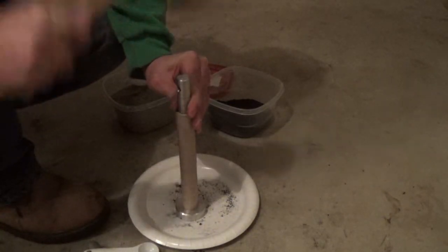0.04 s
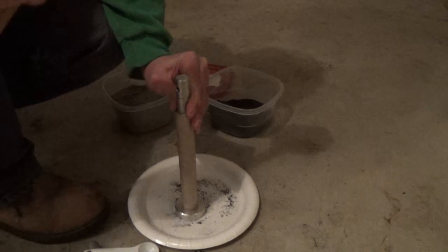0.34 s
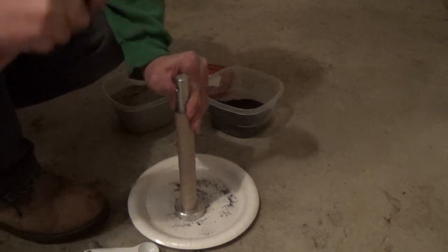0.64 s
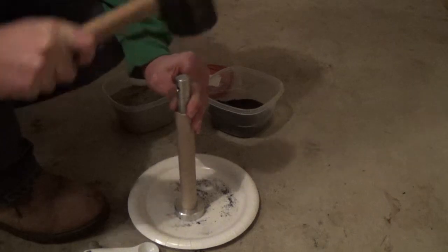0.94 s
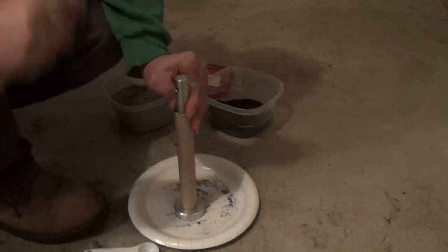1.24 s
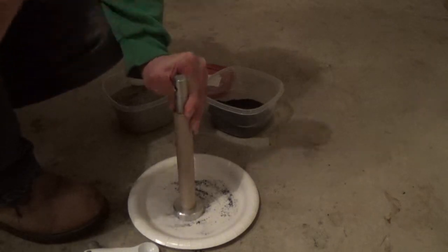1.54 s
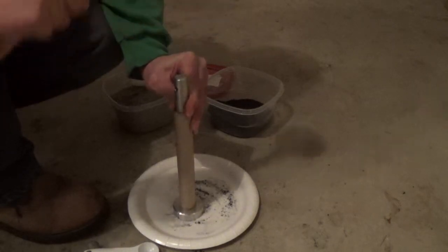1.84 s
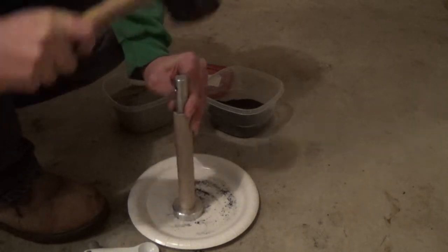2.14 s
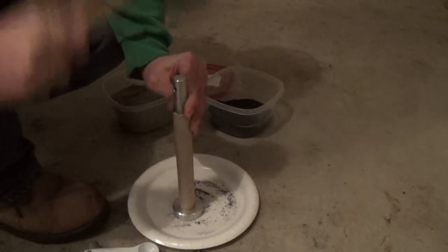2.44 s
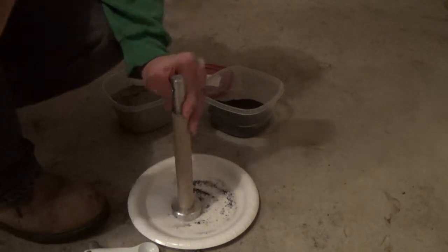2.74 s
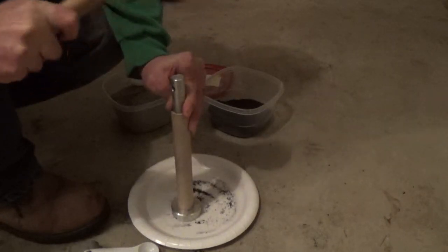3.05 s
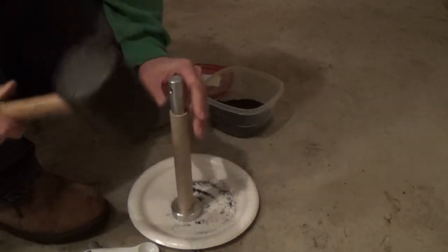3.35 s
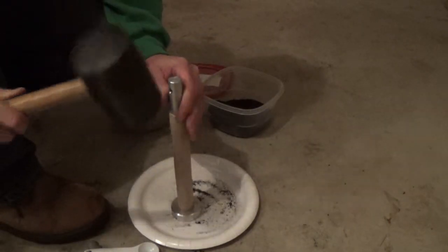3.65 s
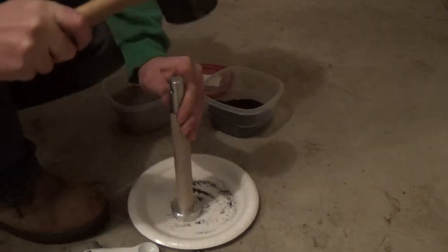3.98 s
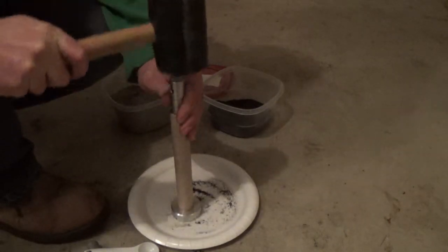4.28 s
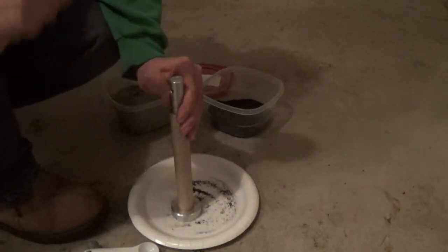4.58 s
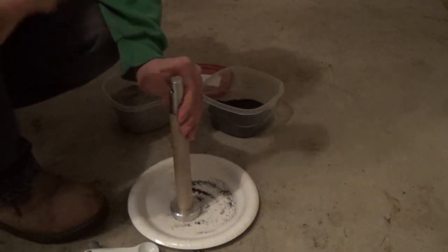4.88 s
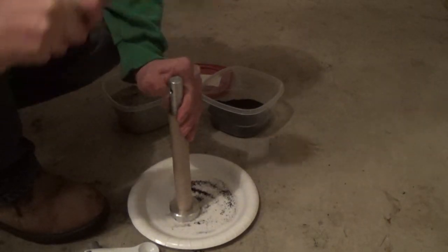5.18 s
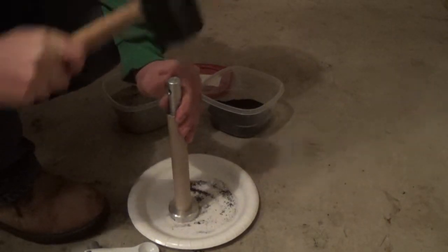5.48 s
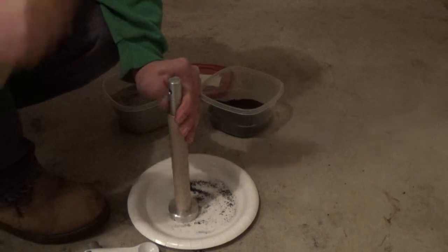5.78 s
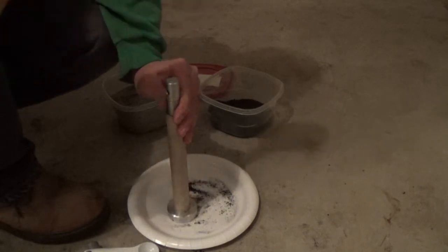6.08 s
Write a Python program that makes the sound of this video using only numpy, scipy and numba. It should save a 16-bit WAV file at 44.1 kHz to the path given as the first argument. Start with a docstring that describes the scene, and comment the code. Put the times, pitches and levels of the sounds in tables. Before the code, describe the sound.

Sharp, evenly paced mallet blows on a metal rammer ring briefly around a bare room, followed by a light tap and four deeper thuds.

```python
"""A bare room with a concrete floor, heard on a camera's stereo microphone. A heavy mallet drives a steel
rammer into a packed cardboard tube: the tail of one blow, then eight in a steady run. After a pause come
one light tap, the rustle of a sleeve and four deeper, duller blows. The hand damps the steel at once, so
the ring is the room's own. Throughout, the camera's gain control flattens the start of each loud blow,
and quiet room tone with a faint mains hum lies underneath."""
import sys
import numpy as np
from scipy import signal
from scipy.fft import rfft, irfft, next_fast_len
from scipy.io import wavfile
from scipy.ndimage import uniform_filter1d, minimum_filter1d
from numba import njit

SR = 44100
rng = np.random.default_rng(int(sys.argv[2]) if len(sys.argv) > 2 else 0)


def dump_mix(stems):
    """Bounce the given channels to the path in sys.argv[1] as a 16-bit WAV at rate SR."""
    frames = np.atleast_2d(stems).T  # one column per channel
    limited = np.clip(frames, -1, 1)  # hard clip at full scale
    pcm = np.round(limited * 32767).astype(np.int16)
    wavfile.write(sys.argv[1], SR, pcm)


N = 269892
RING, LEAD = 32768, SR // 2  # samples that one blow rings for, samples of lead-in
AGE = np.arange(RING) / SR
FREQS = np.fft.rfftfreq(RING, 1 / SR) + 1
# side against mid at the microphone: frequency_hz, side_db
WIDTH = [(60, -55), (200, -32), (600, -10.5), (1300, -8.5), (4400, -8), (7000, -8), (9500, -25),
         (15000, -68)]


def ramming():
    """Each blow cracks, thuds through the tube into the floor and wakes the room from the same spot."""
    # mallet blows: start_s, force_db, softness (of the contact, 0-1), give (of the filling, 0-1)
    blows = [(-.305, -2.5, 0.4, .2), (.1005, 0, 0, 0.27), (0.4991, -1, 0.22, 0), (.9105, -.5, 0.12, 0.1),
             (1.3132, -.5, 0.18, 0), (1.7089, 0, 0, 0), (2.1019, -1, 0.19, 0.14), (2.496, -0.5, 0.06, .1),
             (2.897, -.5, 0.1, 0.04), (4.2082, -18, .9, 0.45), (4.6776, -2.5, 0.82, 1),
             (5.088, -1.5, 0.73, .25), (5.471, -1, 0.83, 0.4), (5.8543, 0, 0.4, 0.23)]
    walls = rfft(stereo_noise(RING))
    standing = standing_waves(db=-16.0, build_s=0.0041, spread=0.28)
    fade = np.minimum(1, 10 * (1 - AGE / AGE[-1]))
    out = np.zeros((2, next_fast_len(LEAD + N + RING)))
    for start_s, force_db, softness, give in blows:
        # the ping grows faster than the force, and is weaker on a filling that yields
        ping_db = 14.5 + 1.2 * force_db - 17 * give
        contact = crack(db=20.5) + ping(ping_db, lag_s=0.000795)
        # a long, soft contact pushes more of the blow down into the floor
        tube_thud = undb(-2.5 + 6 * softness) * knock(hz=193, decay_s=0.0028)
        floor_thump = undb(-41 + 23 * give) * knock(hz=50, decay_s=0.0062)
        echo = standing + reverberation(walls, db=0.5, build_s=0.00039)
        blow = colour(contact + tube_thud + floor_thump + echo, blow_colour(softness, give))
        start = max(LEAD + int(start_s * SR), 0)
        out[:, start:start + RING] += undb(force_db) * fade * blow
    return microphone_ports(out)[:, LEAD:LEAD + N]


def crack(db, decay_s=0.0009):
    """The mallet meets the steel in a short crunch of noise, new at every blow."""
    # spectrum of the contact: frequency_hz, level_db
    spectrum = [(60, 6.5), (300, -25), (1000, 12.5), (2500, 10), (4200, 10.5), (6000, 12.5), (10000, 3),
                (12500, 0), (15000, -14)]
    burst = rng.standard_normal((1, RING)) * (AGE / decay_s) * np.exp(-AGE / decay_s)
    return undb(db) * colour(burst / np.linalg.norm(burst), along(spectrum, FREQS))


def ping(db, lag_s):
    """The steel rings for an instant as the rammer bottoms out."""
    # high modes of the steel under the mallet: pitch_hz, level_db, decay_s
    modes = [(5810, -14, 0.0006), (5790, 0.5, 0.0008), (9500, 3, 0.00062), (10300, -7, 0.00077)]
    age = np.maximum(AGE - lag_s, 0)
    return undb(db) * sum(undb(mode_db) * np.sin(2 * np.pi * hz * age) * np.exp(-age / decay_s)
                          for hz, mode_db, decay_s in modes)


def knock(hz, decay_s):
    """A heavily damped swing of tube or floor that builds within its first cycle."""
    return np.sin(2 * np.pi * hz * AGE) * (AGE / decay_s) * np.exp(1 - AGE / decay_s)


def blow_colour(softness, give):
    """A blow's colour in dB: peaks and dips, duller on soft contact, gritty as the filling yields."""
    # peaks and dips in the blow's colour, from rammer and room: centre_hz, width_hz, gain_db
    peaks = [(1230, 370, -1.5), (1600, 160, 1), (2237, 215, 4), (2486, 247, 5.5), (2750, 66, 3.5),
             (3260, 275, 3), (3612, 440, 5), (5340, 1200, 0), (6040, 880, -0.5), (10400, 5100, 1.5)]
    # a fully soft contact lasts longer, with more body and less clank: frequency_hz, gain_db
    softening = [(150, 4), (1300, 2), (1900, -3), (2450, -2.5), (3500, -9), (7000, -9), (12500, -10)]
    # top-end grit of fully yielding grains: frequency_hz, gain_db
    grit = [(8000, -1), (12500, 7.5)]
    peaks_db = sum(db / (1 + (2 * (FREQS - hz) / width) ** 2) for hz, width, db in peaks)
    return peaks_db + softness * along(softening, FREQS) + give * along(grit, FREQS)


def reverberation(walls, db, build_s):
    """Dense echoes off bare walls, each band dying at its own rate; the treble varies most per blow."""
    # colour of the diffuse sound: frequency_hz, level_db
    room_colour = [(25, -38), (60, -13.5), (120, -6), (190, -8), (320, 2.5), (580, 1), (800, -4.5),
                   (1400, -2), (1950, -3.5), (4400, -7.5), (7000, -10.5), (10000, -14.5), (13000, -25),
                   (16000, -42)]
    # decay of the room: frequency_hz, t60_s
    decays = [(60, 0.88), (300, 0.47), (1000, 0.61), (2800, 0.69), (5500, 0.6), (9000, 0.4), (15000, 0.29)]
    # part of the echo that is new at each blow: frequency_hz, share (0-1)
    fresh_share = [(300, 0.03), (1000, 0.16), (2800, 0), (6000, 0.43), (12000, 0.15)]
    fresh = np.clip(along(fresh_share, FREQS), 0, 1)
    spectrum = walls * np.sqrt(1 - fresh) + rfft(stereo_noise(RING)) * np.sqrt(fresh)
    centres, t60s = np.transpose(decays)
    tail = 0
    for t60, selector in zip(t60s, np.eye(len(centres))):
        band = irfft(spectrum * np.interp(np.log(FREQS), np.log(centres), selector))
        tail = tail + band * np.exp(-np.log(1000) * AGE / t60)
    return undb(db) * colour(tail * (1 - np.exp(-AGE / build_s)), along(room_colour, FREQS))


def standing_waves(db, build_s, spread):
    """The room booms at its modes; each reaches left and right a little out of step."""
    # room modes: pitch_hz, level_db, t60_s
    modes = [(87.2, -17, 0.54), (103.4, -18, 0.45), (122.1, -7, 0.86), (151, 3.5, 0.36), (165.3, 1, 0.39),
             (177, -3, 0.33), (195, -7, 0.49), (226, 1, 0.41), (242.2, 1.5, 0.36), (260.2, -3, 0.62),
             (273.8, 0.5, 0.5), (293.2, 3, 0.52), (326, 1, 0.47), (338, 4, 0.39), (349.2, -8, 0.67),
             (357.5, -2, 0.53), (379.1, 8, 0.28), (392.5, -6, 0.56), (425, -3.5, 0.34), (434, -9, 0.68),
             (470, -8, 0.13), (495, -4.5, 0.42), (542, -26, 0.73), (585.6, -11, 0.68), (667, -0.5, 0.22)]
    boom = 0
    for (hz, mode_db, t60), (turn, skew) in zip(modes, rng.uniform(-0.94, 1, (len(modes), 2))):
        offset = spread * np.sign(skew) * undb(along(WIDTH, hz))
        phase = np.pi * turn + offset * np.array([[1], [-1]])
        decay = np.exp(-np.log(1000) * AGE / t60)
        boom = boom + undb(mode_db) * np.sin(2 * np.pi * hz * AGE + phase) * decay
    return undb(db) * boom * (1 - np.exp(-AGE / build_s))


def microphone_ports(x, lead_rad=1, centre_hz=447):
    """The bass reaches the two ports out of step: the left leads, most of all at centre_hz."""
    ratio = np.fft.rfftfreq(x.shape[-1], 1 / SR) / centre_hz
    turn = lead_rad * 2 * ratio / (1 + ratio ** 2)
    return irfft(rfft(x) * np.exp(.5j * turn * np.array([[1], [-1]])), x.shape[-1])


def sleeve():
    """Cloth rustles as the arm comes down in one long swing."""
    # swell of the downswing: time_s, level_db
    swing = [(4.52, -86), (4.59, -53.5), (4.64, -42.5), (4.675, -60), (4.70, -72)]
    # colour of the cloth: frequency_hz, level_db
    cloth = [(100, -9), (600, -7), (1050, -1), (2200, -3), (3700, -5), (5500, -13), (8500, -11),
             (13000, -19), (15000, -35)]
    level_db = np.interp(np.arange(N) / SR, *np.transpose(swing), left=-np.inf, right=-np.inf)
    return hiss(cloth) * undb(level_db)


def room_tone():
    """Quiet, steady room noise with a faint mains hum."""
    # colour of the room noise: frequency_hz, level_db
    spectrum = [(20, -7), (40, -18.5), (120, -17), (180, -18), (300, -19.5), (700, -26), (1100, -27.5),
                (3000, -27.5), (7000, -31.5), (13000, -38.5), (14500, -60)]
    hum = undb(-59) * np.sin(2 * np.pi * 120 * np.arange(N) / SR)
    return undb(-53) * hiss(spectrum) + hum


def hiss(points):
    """Coloured stereo noise of rms 1."""
    noise = colour(stereo_noise(N), along(points, FREQS))
    return noise / noise.std()


def stereo_noise(size):
    """White noise from all round; the bass and the very top are nearly the same left and right."""
    mid, side = rng.standard_normal((2, size))
    side = colour(side[None], along(WIDTH, FREQS))[0]
    return np.array([mid + side, mid - side])


def colour(x, db):
    """Minimum-phase filter with the gain db at FREQS."""
    cepstrum = irfft(np.log(undb(db)))
    cepstrum[1:RING // 2] *= 2
    cepstrum[RING // 2 + 1:] = 0
    impulse = irfft(np.exp(rfft(cepstrum)))
    return signal.fftconvolve(x, impulse[None], axes=-1)[:, :x.shape[-1]]


def along(points, hz):
    """Read (frequency_hz, value) points on a log-frequency axis."""
    point_hz, value = np.transpose(points)
    return np.interp(np.log(hz), np.log(point_hz), value)


def undb(db):
    """Decibels to gain."""
    return 10 ** (np.asarray(db) / 20)


@njit
def follow(x, attack_s, release_s):
    """Envelope that rises and falls with separate time constants."""
    out, level = np.empty(len(x)), 0.
    for i in range(len(x)):
        level += (x[i] - level) / (1 + SR * (attack_s if x[i] > level else release_s))
        out[i] = level
    return out


def hold_down(x, top_db, attack_s, release_s, ahead_s):
    """Gain control: turns down whatever rises over top_db, looking slightly ahead."""
    envelope = follow(np.abs(x).max(axis=0), attack_s, release_s)
    window = 2 * int(ahead_s * SR) + 1
    gain = np.minimum(1, undb(top_db) / (envelope + 1e-9))
    return x * uniform_filter1d(minimum_filter1d(gain, window), window)


def scene():
    """At the microphone: the blows and the sleeve over the room tone."""
    return ramming() + sleeve() + room_tone()


def record(dry):
    """The camera rides its gain, catches the remaining peaks and cuts the top above 15.5 kHz."""
    ridden = hold_down(dry, top_db=-6.0, attack_s=0.0027, release_s=0.043, ahead_s=0.0018)
    limited = hold_down(ridden, top_db=-5.5, attack_s=0.00002, release_s=0.0012, ahead_s=0.00042)
    return signal.sosfilt(signal.ellip(8, .2, 70, 15500, fs=SR, output="sos"), limited)


dry = scene()
out = record(dry)
dump_mix(out)
```